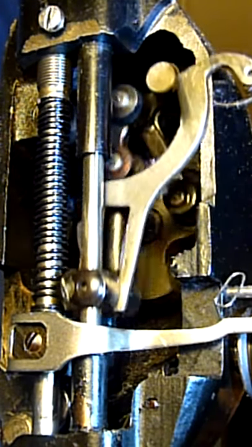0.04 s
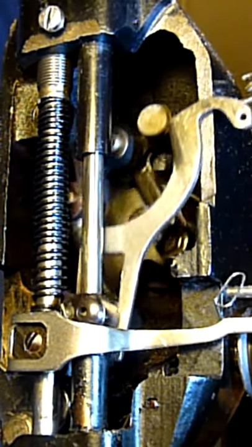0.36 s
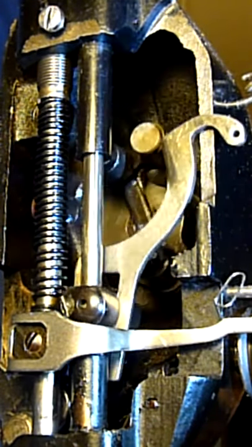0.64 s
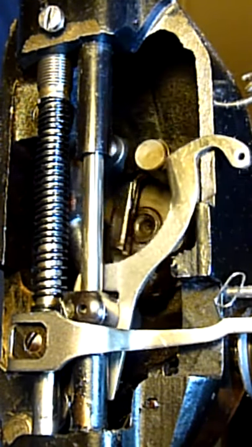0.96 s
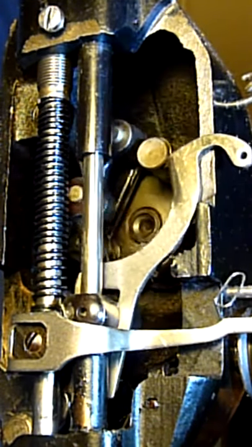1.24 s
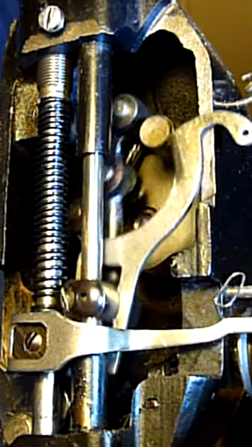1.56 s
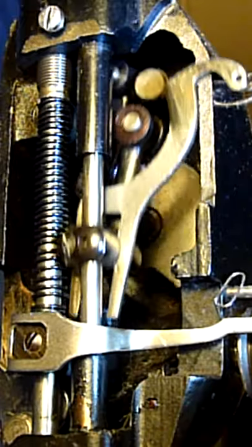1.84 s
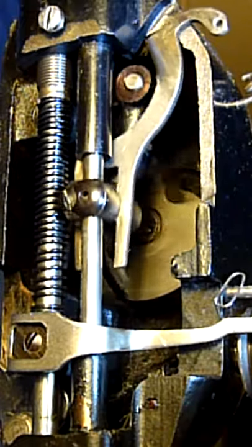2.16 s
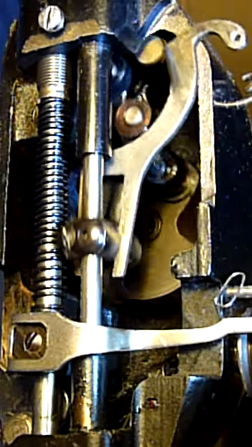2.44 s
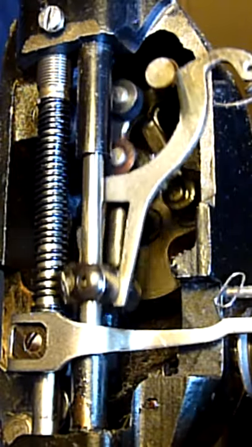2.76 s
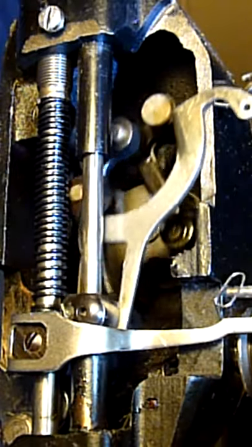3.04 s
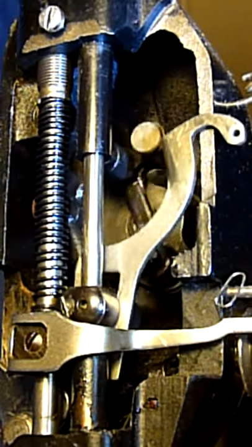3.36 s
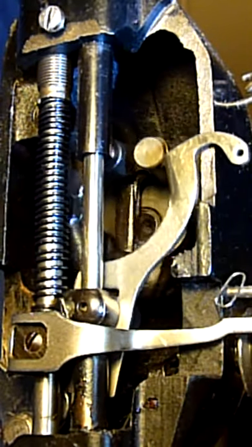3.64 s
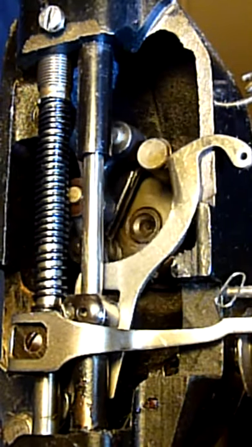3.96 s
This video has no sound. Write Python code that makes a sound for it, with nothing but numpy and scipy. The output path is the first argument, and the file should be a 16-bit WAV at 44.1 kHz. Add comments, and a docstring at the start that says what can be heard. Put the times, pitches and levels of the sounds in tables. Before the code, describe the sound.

A sewing machine motor hums steadily while its slowly turning mechanism clicks and rattles.

```python
"""A sewing machine's throttled motor hums at twice the mains rate, close by in a quiet room.
Magnetic pull on the stator makes the hum; the labouring rotor modulates it and the brushes hiss.
The machine creeps round with its head cover off, buzzing while the needle bar travels.
Once a turn the linkage rattles through its play, each impact exciting damped modes;
single knocks and a faint spring ping fall between."""
import sys
import numpy as np
from scipy import signal
from scipy.fft import rfft, irfft
from scipy.io import wavfile

SR = 44100
rng = np.random.default_rng(int(sys.argv[2]) if len(sys.argv) > 2 else 0)


def file_out(sig):
    """Save sig as 16-bit WAV at sys.argv[1]."""
    # one column per channel
    cols = np.atleast_2d(sig).T
    # limit, then scale
    lim = np.clip(cols, -1, 1)
    pcm = np.round(lim * 32767).astype(np.int16)
    wavfile.write(sys.argv[1], SR, pcm)


N = 176400
T = np.arange(N) / SR
HUM_HZ = 99.854  # twice the mains frequency


def from_db(db):
    """Amplitude ratio of a level in decibels."""
    return 10 ** (np.asarray(db) / 20)


def unit_rms(x):
    """Normalisation to unit mean power."""
    return x / np.sqrt(np.mean(x ** 2) + 1e-20)


def in_time(rows):
    """Linear interpolation of each column after the time, sample by sample."""
    times, *columns = np.transpose(rows)
    return [np.interp(T, times, column) for column in columns]


def drift(rate_hz):
    """Low-passed noise: a slow random fluctuation of unit rms."""
    hop, settle = 100, 1000
    pole = np.exp(-2 * np.pi * rate_hz * hop / SR)
    noise = rng.standard_normal(N // hop + settle + 2)
    slow = signal.lfilter([1], [1, -2 * pole, pole ** 2], noise)[settle:]
    return np.interp(np.arange(N) / hop, np.arange(len(slow)), unit_rms(slow))


def coloured_noise(gain_at):
    """Spectral shaping of white noise, scaled to unit rms."""
    hz = np.arange(N // 2 + 1) * SR / N + 1e-3
    return unit_rms(irfft(rfft(rng.standard_normal(N)) * gain_at(hz), N))


def resonate(force, modes):
    """Modal superposition: unit white noise drives each two-pole resonator to its listed level."""
    response = 0
    for k, (hz, width, db) in enumerate(modes):
        radius = np.exp(-np.pi * width / SR)
        gain = from_db(db) * np.sqrt((1 - radius ** 2) / 2) * (-1) ** k
        feedback = [1, -2 * radius * np.cos(2 * np.pi * hz / SR), radius ** 2]
        response += signal.lfilter([gain, 0, -gain], feedback, force + 1e-18)
    return response


def steep_gain(hz, modes):
    """Magnitude response of steep-sided resonances that add in power."""
    gains = [from_db(db) / (1 + 2 * ((hz - centre) / width) ** 2) for centre, width, db in modes]
    return np.linalg.norm(gains, axis=0)


def total_gain(modes):
    """Incoherent sum: the joint amplitude of modes whose powers add."""
    return np.linalg.norm([from_db(db) for _, _, db in modes])


def hum_partial(k, waver_db=1, waver_hz=6.7, lag_s=0.0055, spread_rad=0.21):
    """Harmonic k of the hum, wavering about unit rms; higher harmonics trail in phase."""
    phase = 2 * np.pi * HUM_HZ * k * (T - lag_s) - spread_rad * k ** 2
    return -np.sqrt(2) * from_db(waver_db * drift(waver_hz)) * np.sin(phase)


def brushes(hiss_db=-53, treble_hz=2360, waver_db=1.76, pulse_depth=0.14, lag_s=0.0046):
    """Sliding friction makes broadband noise and excites the casing; both pulse with the current."""
    # brush and bearing hiss: (frequency [Hz], relative spectral level [dB])
    spectrum = [(25, 1), (70, 12), (300, 13.5), (600, 12.5), (740, 1.5), (1000, 3), (1350, 0), (1900, 1),
                (2700, -1), (3200, -2.5), (4200, -6.5), (4900, -8), (5700, -4.5), (6400, -5.5),
                (7200, -8.5), (9200, -6), (11300, -12.5), (12800, -7), (15500, -16)]
    # slow course of the treble: (time [s], gain [dB])
    treble_curve = [(0, 2.5), (.5, 0.5), (.62, 0), (.75, 1.5), (1.35, -1), (1.5, 0.5), (1.85, -2), (2.1, 1),
                    (2.35, 2), (2.7, 1), (3.05, 1.5), (3.22, 0), (3.45, 0.5), (4, 0)]
    # casing resonances: (frequency [Hz], bandwidth [Hz], level [dB])
    casing_modes = [(905, 18, -73.5), (1664, 30, -64.5), (4176, 27, -79.5), (6230, 220, -72.5),
                    (8850, 270, -77)]
    hz, db = np.transpose(spectrum)
    hiss = from_db(hiss_db) * coloured_noise(lambda f: from_db(np.interp(np.log(f), np.log(hz), db)))
    low = signal.sosfiltfilt(signal.butter(2, treble_hz, fs=SR, output="sos"), hiss)
    treble = (hiss - low) * from_db(in_time(treble_curve)[0] + waver_db * drift(rate_hz=21))
    casing = resonate(rng.standard_normal(N), casing_modes)
    pulsing = 1 + pulse_depth * np.cos(2 * np.pi * HUM_HZ * (T - lag_s))
    return pulsing * (low + treble + casing)


def buzz(pulse_depth=0.67, lag_s=0.0039):
    """Forced vibration: moving parts chatter in time with the hum."""
    # swells as the needle bar travels: (time [s], gain [dB])
    travel = [(0, 2), (.38, -3), (.5, -0.5), (.68, 3.5), (.9, -1), (1.2, -3.5), (1.6, -2), (1.8, 3),
              (2.0, 3), (2.18, 3.5), (2.32, -3), (2.75, 0.5), (3.1, -6.5), (3.35, -3.5), (3.55, -7),
              (4, -5)]
    # tonal part: (harmonic of the hum, level [dB])
    partials = [(7, -73.5), (8, -69), (9, -71.5), (10, -71.5), (11, -78.5), (12, -74.5)]
    # rattling part: (frequency [Hz], width [Hz], level [dB])
    modes = [(705, 51, -70.5), (876, 57, -76.5), (1047, 34, -68)]
    tones = sum(from_db(db) * hum_partial(k) for k, db in partials)
    rattle = total_gain(modes) * coloured_noise(lambda hz: steep_gain(hz, modes))
    pulsing = 1 + pulse_depth * np.cos(2 * np.pi * HUM_HZ * (T - lag_s))
    return from_db(in_time(travel)[0]) * (tones + pulsing * rattle)


def spring(start_s=2.335, hz=2993, db=-47, rise_s=0.0034, t60_s=0.28):
    """Damped free vibration: a brushed spring rings on one note."""
    age = np.maximum(T - start_s, 0)
    envelope = (1 - np.exp(-age / rise_s)) * from_db(db - 60 * age / t60_s)
    return envelope * np.sin(2 * np.pi * hz * age)


def impacts(contacts, modes, t60_s, crack, rise_s=0.0004, room_db=-18, room_t60_s=0.27):
    """Impact excitation: an impulse, dying chatter and a faint room tail drive the modes."""
    power, impulses = np.zeros(N), np.zeros(N)
    for time_s, db in contacts:
        start = int(time_s * SR)
        age = T[:min(SR // 2, N - start)]
        rise = 1 - np.exp(-age / rise_s)
        decay = from_db(-60 * age / t60_s) ** 2
        room_tail = from_db(room_db - 60 * age / room_t60_s) ** 2
        power[start:start + len(age)] += from_db(db) ** 2 * rise * (decay + room_tail)
        impulses[start] += crack * from_db(db)
    chatter = np.sqrt(power) * rng.standard_normal(N)
    return resonate(impulses + chatter, modes) / total_gain(modes)


def linkage(rebound_s=0.0036, rebound_db=-5.5):
    """Backlash: links tick and joints knock; each knock rebounds once and rings casting and lever."""
    # light touches of the links: (time [s], level [dB])
    touches = [(.0645, -37.5), (.0762, -47), (2.8298, -39.5), (2.8425, -49)]
    # joints taking up their play: (time [s], knock level [dB], thud level [dB], clack level [dB])
    blows = [(.063, -57, -51, -49), (.0762, -43, -45.5, -51), (.0858, -58, -56, -54),
             (0.0967, -31, -48, -60), (0.11, -41, -46.5, -62), (0.128, -41.5, -50, -55),
             (0.165, -65, -51, -54), (.185, -53, -62, -54), (0.473, -50.5, -63, -78),
             (0.875, -43, -59, -55), (1.045, -57, -61, -58), (1.474, -53, -61, -52),
             (1.518, -46.5, -60, -54), (1.531, -54, -60, -58), (2.3258, -56, -70, -68),
             (2.829, -64, -52, -56), (2.8429, -44, -49, -52), (2.8581, -36.5, -53, -52),
             (2.8655, -46, -58, -58), (2.872, -41, -61, -54), (2.9002, -50, -54, -56),
             (2.917, -60, -57, -59), (2.937, -65, -52, -54), (3.205, -51, -62, -66),
             (3.6275, -39.5, -48, -55), (3.652, -55, -54, -59)]
    # resonances of each part: (frequency [Hz], bandwidth [Hz], relative level [dB])
    link_modes = [(2070, 160, -4), (3860, 100, -4), (5300, 160, 1.5), (9600, 170, 2), (10840, 450, 7),
                  (11600, 140, -3), (12800, 370, 3), (14200, 350, -3), (15000, 300, -4)]
    joint_modes = [(2850, 580, -7), (3500, 360, -3.5), (4260, 290, 1.5), (5630, 510, 0), (6260, 140, 4),
                   (7150, 810, -2.5), (8130, 300, -1), (9250, 420, 0), (9900, 400, -1.5),
                   (11020, 420, -1.5), (12200, 400, -8), (14200, 800, -8)]
    casting_modes = [(875, 23, 3), (1044, 91, -3)]
    lever_modes = [(1300, 530, -4), (2024, 220, 1.5), (2270, 140, -1), (2690, 710, -10)]
    times, knock_db, thud_db, clack_db = np.transpose(blows)
    contacts = [*zip(times, knock_db), *zip(times + rebound_s, knock_db + rebound_db)]
    knocks = impacts(contacts, joint_modes, t60_s=0.026, crack=4.6)
    thuds = impacts(zip(times, thud_db), casting_modes, t60_s=0.11, crack=5.4)
    clacks = impacts(zip(times, clack_db), lever_modes, t60_s=0.13, crack=8)
    ticks = impacts(touches, link_modes, t60_s=0.039, crack=7.1)
    return ticks + knocks + thuds + clacks


def rotor(outer_db=-10.5, waver_db=1.5, waver_hz=9.9, rumble_db=-52.5):
    """Modulation: the surging rotor puts sidebands round the hum's harmonics, over bearing rumble."""
    # rotor under changing load: (time [s], speed [turns/s], gain of the low sidebands [dB],
    # gain of the sideband just above harmonic 2 [dB])
    load = [(0, 61, 11, -2), (.08, 48, 4, 2), (.18, 61, 0, 6.5), (.3, 49, -4, 4), (.38, 56, -7, -4),
            (.46, 64, 7, 11.5), (.52, 80, 5, 7), (.63, 60, 5, 1), (.7, 57, 7, 10), (.8, 65.5, -3, 9),
            (.9, 70, 2.5, 9), (1.1, 58, -5, 4), (1.23, 77.4, 4, 7), (1.37, 66, 2, -10), (1.47, 51.7, 1, 2),
            (1.57, 43.5, -2, -1), (1.7, 59.5, -5, -4), (1.82, 68, 4, -14), (1.93, 64, 1, -7),
            (2.04, 50, 0, 7.5), (2.19, 75, 1, 10.5), (2.31, 57, 0, 5), (2.42, 53, 0, 2),
            (2.54, 69, -1.5, -14), (2.64, 63, 4, 1), (2.72, 53, 0, 8), (2.8, 42, 4, -5), (2.94, 60, -1, 8),
            (3.08, 50, 9, -5), (3.2, 49, 5, 9), (3.3, 67, 0.5, -2), (3.43, 51, 7, 11), (3.54, 59.4, -1, 6),
            (3.65, 73, 0, 11.5), (3.85, 52, 1, 1), (3.96, 66, -2, 4), (4, 71, -7, -6)]
    # frame resonances that colour sidebands and rumble: (frequency [Hz], width [Hz], level [dB])
    frame_modes = [(70, 17, -63), (133.3, 18, -50), (165.2, 15.5, -59), (232, 12, -58), (250, 50, -51.5),
                   (351, 18, -56), (457, 19.4, -55), (486, 2.4, -46), (506.5, 10, -59), (576.4, 26, -57),
                   (635.4, 51, -66.5)]
    speed, low_db, swell_db = in_time(load)
    angle = 2 * np.pi * np.cumsum(speed) / SR
    # keyed by (harmonic, sideband order)
    load_db = {(1, 1): low_db, (2, -1): low_db, (2, 1): swell_db, (3, -1): low_db - 5}
    sidebands = 0
    for k in range(1, 7):
        for side in (-2, -1, 1, 2):
            gain_db = load_db.get((k, side), 0) + outer_db * (abs(side) - 1) + waver_db * drift(waver_hz)
            frame_gain = steep_gain(k * HUM_HZ + side * speed, frame_modes)
            tone = np.sqrt(2) * np.sin(2 * np.pi * (k * HUM_HZ * T + rng.random()) + side * angle)
            sidebands += from_db(gain_db) * frame_gain * tone
    rumble = from_db(rumble_db) * coloured_noise(lambda hz: steep_gain(hz, frame_modes))
    return sidebands + rumble


def hum():
    """Magnetic attraction tugs the stator once each half wave of the mains, giving a harmonic series."""
    # strong partials: (time [s], levels of harmonics 1, 2, 3 and 5 [dB])
    strong = [(0, -43.5, -40.5, -41, -52), (0.17, -43.5, -42, -42, -47.5), (0.26, -49.5, -43.5, -44.5, -52),
              (0.36, -46.5, -41.5, -43.5, -50.5), (0.48, -46, -37.5, -42, -50.5),
              (0.75, -46, -40, -40.6, -46.5), (0.88, -48, -42, -46.5, -57), (1.03, -49.5, -47, -44.5, -50),
              (1.2, -51.5, -39, -44.5, -54.5), (1.38, -54, -36.5, -43, -48), (1.62, -51.5, -38, -43, -50),
              (2.05, -56.5, -35, -39, -48.5), (2.3, -53.4, -38.5, -43, -48.5),
              (2.5, -53.5, -37, -42, -45.5), (2.77, -52, -35, -38.5, -44.5), (3.08, -57, -36.5, -43, -47.5),
              (3.42, -54.9, -33, -40, -45), (3.8, -60, -39.4, -48, -50), (4, -51, -36.5, -41.5, -47.5)]
    # partials of constant mean level: (harmonic, level [dB])
    steady = [(4, -49.5), (6, -50.5), (22, -74.5), (26, -78.5), (28, -77), (30, -112)]
    partials = [*zip((1, 2, 3, 5), in_time(strong)), *steady]
    return sum(from_db(db) * hum_partial(k) for k, db in partials)


def scene():
    """Superposition of motor and mechanism in one channel."""
    return (hum() + buzz() + rotor() + brushes() + linkage() + spring())[None]


def record(dry):
    """Frequency response of the microphone: one narrow notch and a steep treble cut."""
    notch_hz, width_hz, cutoff_hz = 8000, 300, 15750
    notched = signal.lfilter(*signal.iirnotch(notch_hz, notch_hz / width_hz, fs=SR), dry)
    return signal.sosfilt(signal.ellip(10, 0.1, 80, cutoff_hz, fs=SR, output="sos"), notched)


dry = scene()
out = record(dry)
file_out(out)
```